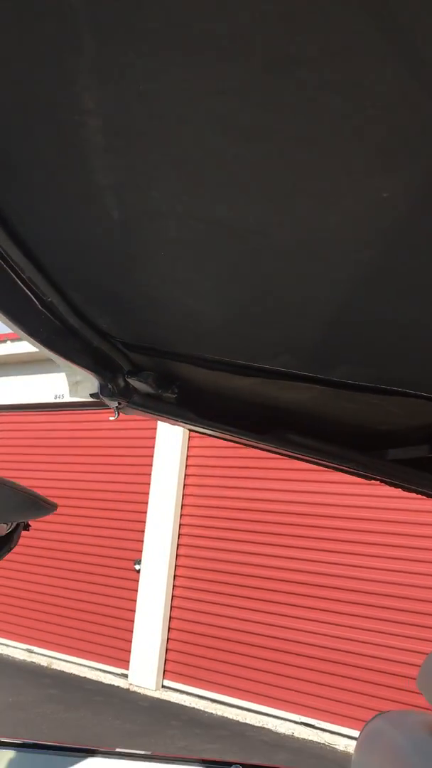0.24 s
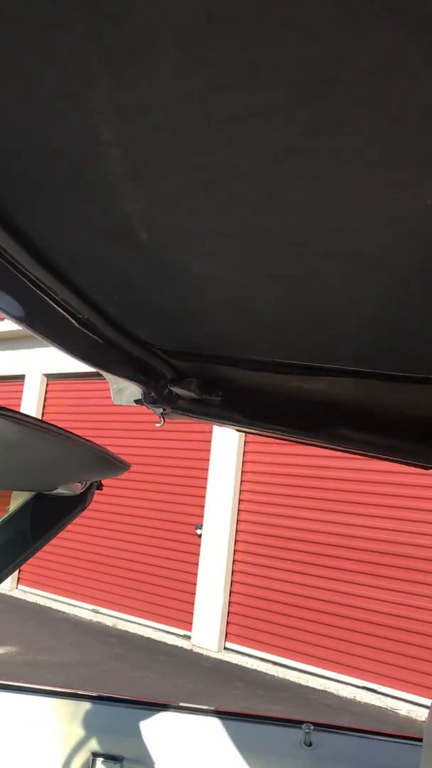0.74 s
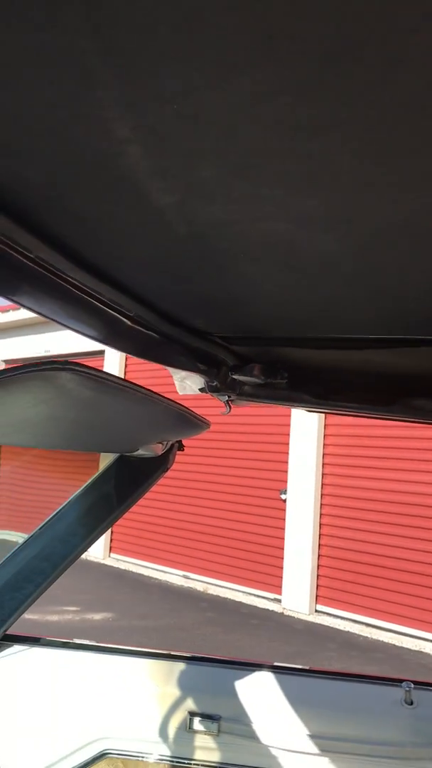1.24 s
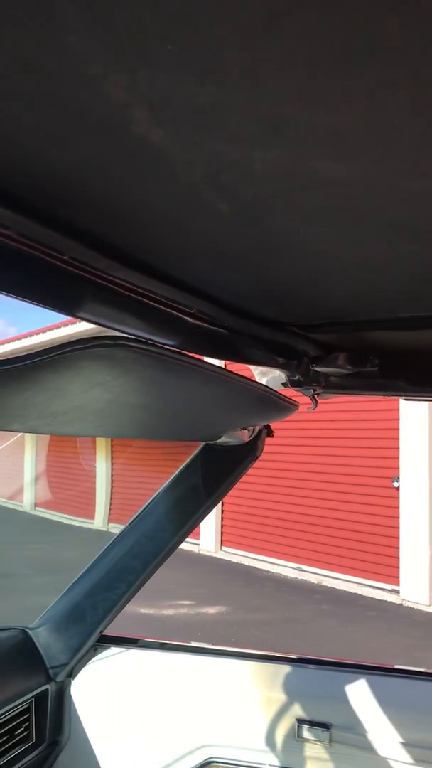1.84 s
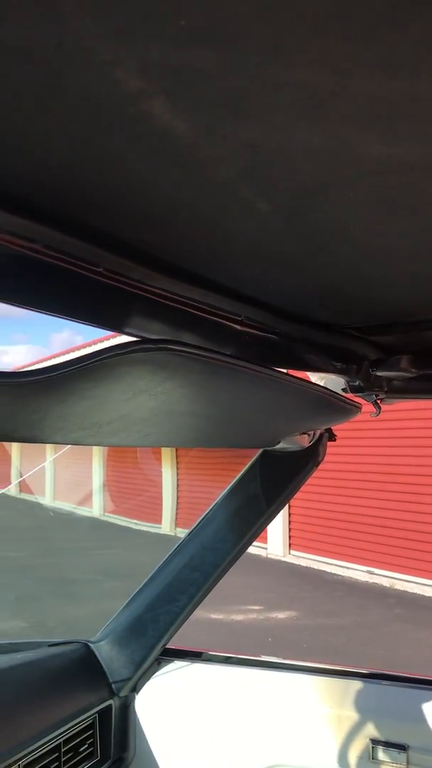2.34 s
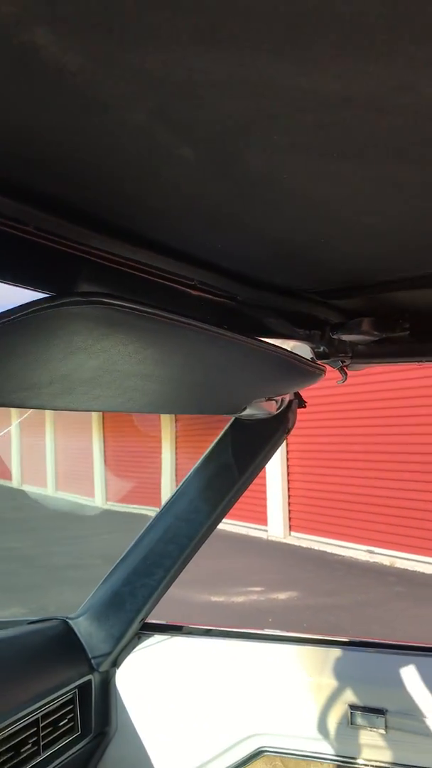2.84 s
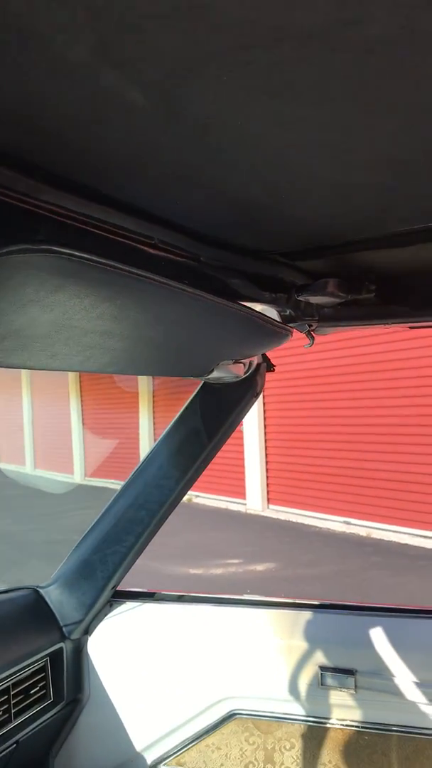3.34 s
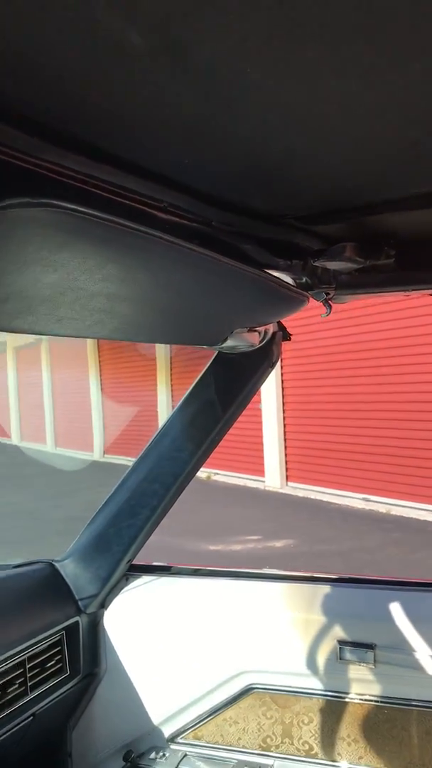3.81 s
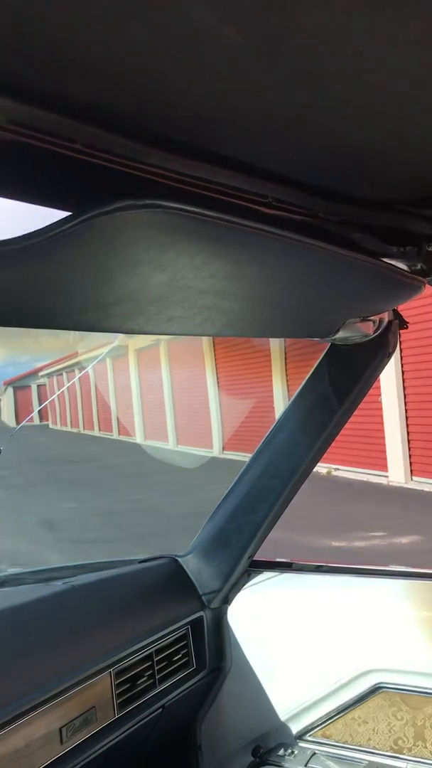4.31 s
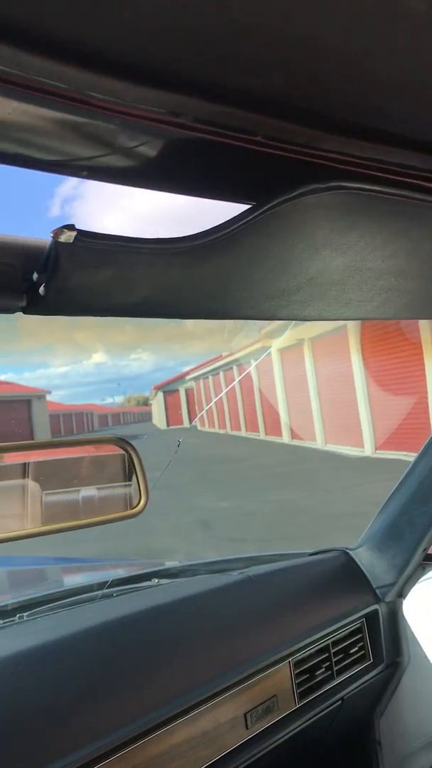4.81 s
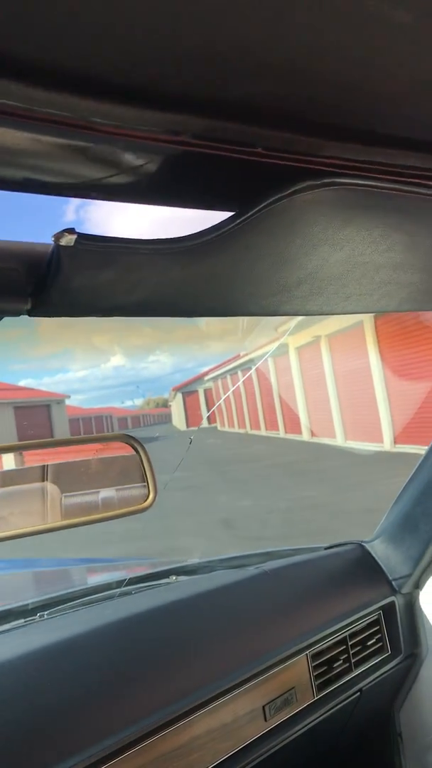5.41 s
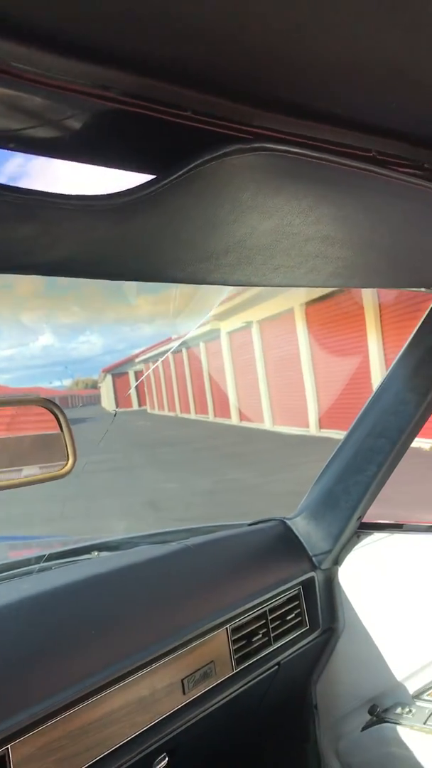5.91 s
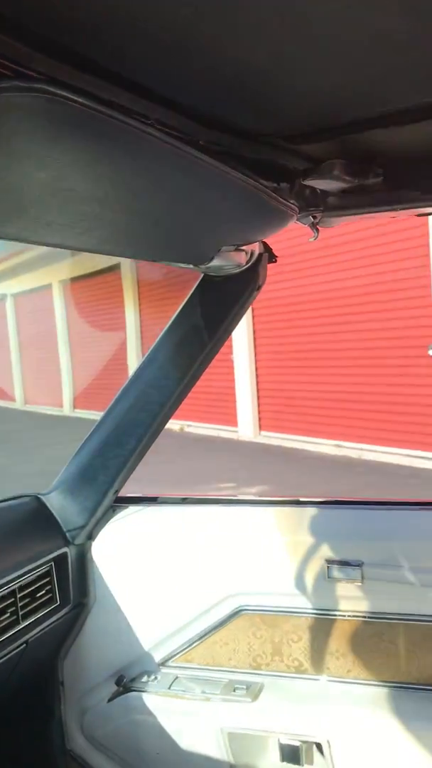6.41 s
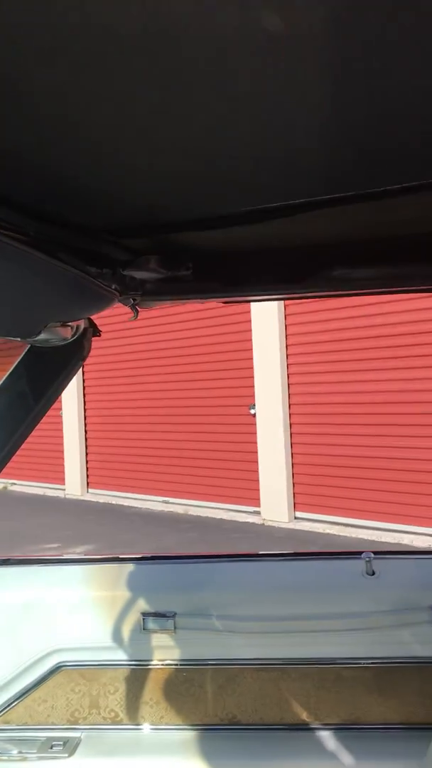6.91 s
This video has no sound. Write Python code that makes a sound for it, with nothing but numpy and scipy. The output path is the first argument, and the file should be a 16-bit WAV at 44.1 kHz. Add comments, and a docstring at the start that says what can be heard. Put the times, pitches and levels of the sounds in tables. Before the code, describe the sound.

From the front seat of an old convertible, a V8 engine idles with a low, throbbing burble and a body drone, its valves ticking rhythmically with small high squeaks. Over it, a hydraulic pump whirs and whines from the start as the soft top closes. At about 0.8 seconds the roof linkage gives a sharp, bright clack. Between 1.5 and 1.8 seconds the canvas pulls taut in a quick cluster of dull thuds, with another at 3.7. Frame joints tick singly from about 2.2 to 3.8 seconds, and two lighter knocks follow near 4.1, where the pump's whine drops back. The engine revs gently from about 4 seconds, peaks at 4.7 and eases off. A few quick ticks come around 5.5 seconds. A second, smaller rev peaks near 6.6, with a light knock, and the engine settles toward idle by 7 seconds.

```python
"""Closing the top of a convertible

Inside an old car a V8 idles and is revved gently twice. Its exhaust throbs in harmonics of the engine
cycle, the body drones, and the valve gear ticks, rings and squeaks as each cycle comes round.
A hydraulic pump whirs behind the seats and folds the frame forward: the linkage clacks,
the bows knock, the canvas flaps softly and the joints tick as they slip."""
import sys
import numpy as np
from scipy import signal
from scipy.fft import rfft, irfft
from scipy.io import wavfile
from scipy.ndimage import uniform_filter1d

SR = 44100
rng = np.random.default_rng(int(sys.argv[2]) if len(sys.argv) > 2 else 0)


def transcribe(signal):
    """Save signal, clipped to [-1, 1], as a 16-bit WAV file at the path in sys.argv[1]."""
    frames = np.atleast_2d(signal).T
    limited = np.clip(frames, -1, 1)
    pcm = np.round(limited * 32767).astype(np.int16)
    wavfile.write(sys.argv[1], SR, pcm)


N = 315315
TIME = np.arange(N) / SR
EVENT_TIME = TIME[:SR // 5]
BIN_HZ = np.fft.rfftfreq(N, 1 / SR)


def amp(db):
    """Amplitude ratio of a level in decibels."""
    return 10 ** (np.asarray(db) / 20)


def unit(x):
    """The signal scaled to an rms of one."""
    return x / np.sqrt(np.mean(x ** 2) + 1e-20)


def curve(rows, column=1):
    """One column of a time table, interpolated at every sample."""
    rows = np.array(rows)
    return np.interp(TIME, rows[:, 0], rows[:, column])


def response(spectrum, hz):
    """Gain of a spectrum, interpolated on a log-frequency axis."""
    points_hz, db = np.transpose(spectrum)
    return amp(np.interp(np.log(hz + 1), np.log(points_hz), db))


def filtered_noise(gain):
    """White noise weighted in frequency, at an rms of one."""
    return unit(irfft(rfft(rng.standard_normal(N)) * gain, N))


def noise(spectrum, tilt_db=0):
    """Noise of a given spectrum, tilted in dB per octave and rolled off past its ends."""
    hz = BIN_HZ + 1
    skirts = np.minimum(1, hz / spectrum[0][0]) ** 2 * np.minimum(1, spectrum[-1][0] / hz) ** 2
    return filtered_noise(response(spectrum, hz) * skirts * amp(tilt_db * np.log2(hz)))


def band(centre_hz, width_hz):
    """Noise in one resonance with steep skirts."""
    return filtered_noise(1 / (1 + ((BIN_HZ - centre_hz) / width_hz) ** 2) ** 2)


def drift(rate_hz):
    """Low-pass noise: a smooth random fluctuation."""
    return filtered_noise(np.exp(-(BIN_HZ / rate_hz) ** 2))


def stretch(source):
    """A random stretch of a signal, one event long."""
    start = rng.integers(N - len(EVENT_TIME))
    return source[start:start + len(EVENT_TIME)]


def envelope(decay_s, rise_s):
    """Quick build-up and exponential decay of a damped vibration."""
    return (1 - np.exp(-EVENT_TIME / rise_s)) * np.exp(-EVENT_TIME / decay_s)


def burst(source, decay_s, rise_s):
    """A damped transient cut from a noise."""
    return stretch(source) * envelope(decay_s, rise_s)


def add(mix, start_s, sound):
    """Superposes a sound on the mix."""
    part = mix[max(round(start_s * SR), 0):][:len(sound)]
    part += sound[:len(part)]


def reflections(x, wet_db, t60_s):
    """Reverberation: glass and trim add short, dense echoes."""
    t = EVENT_TIME
    taps = rng.standard_normal(len(t)) * (rng.random(len(t)) < 0.1)
    taps *= (t > 0.002) * amp(-60 * t / t60_s)
    return x + amp(wet_db) * signal.oaconvolve(x, taps / np.linalg.norm(taps))[:N]


def rustle(x, patchy_db, ripple_db):
    """Small resonances flare briefly; interfering reflections leave a steady spectral ripple."""
    spectra = signal.stft(x, nperseg=512, noverlap=384)[2]
    patches = uniform_filter1d(rng.standard_normal(spectra.shape), size=4, axis=0)
    patches = unit(uniform_filter1d(patches, size=7, axis=1))
    ripple = unit(uniform_filter1d(rng.standard_normal(len(spectra)), size=2))[:, None]
    spectra *= amp(patchy_db * patches + ripple_db * ripple)
    return np.std(x) * unit(signal.istft(spectra, nperseg=512, noverlap=384)[1][:N])


def pull(rpm, lead_s=0.036, ease_s=0.33):
    """Smoothed acceleration in rpm per second, advanced because the throttle leads the speed."""
    eased = uniform_filter1d(np.gradient(rpm) * SR, size=round(ease_s * SR))
    return np.interp(TIME + lead_s, TIME, eased)


def each_cycle(cycles, phase):
    """The times at which the engine passes one phase (0-1) of its cycle."""
    return np.interp(np.arange(phase, cycles[-1], 1), cycles, TIME)


# Exhaust harmonics. Each row: multiple of the cycle rate, relative level in dB.
EXHAUST_ORDERS = [(5, -7.5), (7, -71), (8, 0), (9, -11), (10, -11.5), (11, -4.5), (12, -9), (13, -3),
                  (14, -14), (15, -8), (16, -1.5), (17, -5), (19, -7.5), (21, -13), (24, -5), (29, -13),
                  (32, -20)]
# Transmission into the cabin. Each row: frequency in Hz, gain in dB.
CABIN_RESPONSE = [(30, -26), (46, 1), (62, 0.5), (76, 0.5), (100, 2), (112, -8.5), (126, -21), (143, -4.5),
                  (185, -20.5), (230, -15)]
# Cabin resonance: centre in Hz, half width in Hz, peak gain in dB.
CABIN_BOOM = (57.7, 2.9, 4.3)

def exhaust(rpm, cycle_hz, cycles):
    """Periodic pulses form a harmonic series: order 8 is the firing tone, all others make the burble."""
    firing, burble = np.zeros(N), np.zeros(N)
    boom_hz, boom_width_hz, boom_db = CABIN_BOOM
    for order, db in EXHAUST_ORDERS:
        hz = order * cycle_hz
        tone = amp(db) * response(CABIN_RESPONSE, hz) * np.cos(2 * np.pi * (order * cycles + rng.random()))
        if order == 8:
            boom = amp(boom_db / (1 + ((hz - boom_hz) / boom_width_hz) ** 2))
            firing += boom * tone * (1 + 0.06 * drift(4))
        else:
            burble += tone * (1 + 0.21 * drift(8.6))
    idle_rpm, knee_rpm = 715, 104
    above_idle = np.maximum(rpm - idle_rpm, 0)
    firing_db = -28.5 + 0.0169 * above_idle + 0.0096 * np.maximum(pull(rpm), 0)
    burble_db = -36 + 7 * np.tanh(above_idle / knee_rpm)
    return amp(firing_db) * firing + amp(burble_db) * burble


# Drone of the body. Each row: time in seconds, level in dB.
BODY_LEVEL = [(0, -44.5), (1.6, -42.5), (3, -45), (6.1, -45), (6.27, -55), (7.15, -44.5)]
# Its spectrum. Each row: frequency in Hz, relative level in dB.
BODY_SPECTRUM = [(30, -13), (48, -8.5), (90, -4.5), (125, -1.5), (170, 2), (230, -6), (262, -7), (285, -3),
                 (315, -10), (390, -10.5), (480, -18), (650, -30.5)]

def body_rumble():
    """Forced vibration: the running engine makes the body drone."""
    return amp(curve(BODY_LEVEL) + 0.62 * drift(21)) * noise(BODY_SPECTRUM)


# Spectrum of the valve gear. Each row: frequency in Hz, relative level in dB.
VALVE_SPECTRUM = [(1200, -20), (2200, -14), (3100, -9), (3900, -2.5), (4400, -6), (4900, -4.5), (5800, 3),
                  (6500, 3.5), (7200, -1.5), (8200, 0), (9600, -6), (10400, -11), (11300, -13),
                  (15700, -22)]
# Loose tappets. Each row: cycle phase from 0 to 1, relative level in dB, tilt in dB per octave.
TAPPET_IMPACTS = [(.14, -1, -8), (.365, -0.5, 4.5), (.6, -2, 2), (.742, 3, 1)]
# Resonance of the valve cover: centre in Hz, width in Hz.
COVER_MODE = (4397, 92)
# Blows that excite it. Each row: cycle phase from 0 to 1, relative level in dB.
COVER_IMPACTS = [(.2, -6), (.63, -2), (.77, -5.5)]

def valve_gear(cycles, level_db):
    """Impact excitation: in every cycle the tappets rattle and the cover rings, over a mechanical hiss."""
    rattle, rings, cover = np.zeros(N), np.zeros(N), band(*COVER_MODE)
    for phase, db, tilt_db in TAPPET_IMPACTS:
        tappet = noise(VALVE_SPECTRUM, tilt_db)
        for start in each_cycle(cycles, phase):
            strength = amp(db + 2 * rng.standard_normal())
            add(rattle, start, strength * burst(tappet, decay_s=0.016, rise_s=0.0027))
    for phase, db in COVER_IMPACTS:
        for start in each_cycle(cycles, phase):
            strength = amp(db + 1.5 * rng.standard_normal())
            add(rings, start, strength * burst(cover, decay_s=0.025, rise_s=0.003))
    hiss = amp(-3 + 1.47 * drift(47)) * noise(VALVE_SPECTRUM)
    gear = rustle(hiss + amp(4.5) * rattle, patchy_db=2.6, ripple_db=0.7)
    return amp(level_db) * (gear + amp(-1.5) * rings)


# Pump motor. Each row: time in seconds, shaft rate in Hz, whine level in dB.
PUMP_MOTOR = [(0, 90.6, -50.5), (.5, 87.4, -51), (1.1, 86.6, -54), (1.6, 89.8, -52), (2.35, 89.3, -51),
              (3.0, 88.6, -52.5), (3.9, 88.6, -53.5), (4.2, 85.1, -62), (7.15, 86.25, -57)]
# Its harmonics. Each row: multiple of the shaft rate, relative level in dB.
PUMP_HARMONICS = [(2, -7), (4, -8.5), (5, -3.5), (6, -5), (12, -16)]
# Broad whir, loudest as the pump takes up the load. Each row: time in seconds, level in dB.
WHIR_LEVEL = [(0, -48), (.67, -48), (1.1, -54.5), (5, -53), (5.6, -51.5), (7.15, -52)]
# Its spectrum. Each row: frequency in Hz, relative level in dB.
WHIR_SPECTRUM = [(200, 14.5), (420, 10), (600, 9), (750, 7), (950, -0.5), (1400, 4.5), (1900, 1.5),
                 (2600, -2), (3700, -4), (5000, -6.5), (9000, -20)]
# Oil in the valve and hoses, quieter as the top comes down. Each row: time in seconds, level in dB.
OIL_LEVEL = [(0, -51), (2.3, -50), (3.6, -53), (4.7, -52.7), (4.87, -60), (7.15, -61)]
# Its spectrum. Each row: frequency in Hz, relative level in dB.
OIL_SPECTRUM = [(420, -8), (650, 1.5), (850, 2), (1060, 2.5), (1200, -0.5), (1400, -3.5), (1750, -10.5),
                (2400, -14.5)]

def hydraulic_pump():
    """Rotation gives harmonics of the shaft rate, heard with a broadband whir and the oil's flow noise."""
    turns = np.cumsum(curve(PUMP_MOTOR) * (1 + 0.00912 * drift(12.6))) / SR
    whine = sum(amp(db) * (1 + 0.26 * drift(40)) * np.sin(2 * np.pi * order * turns)
                for order, db in PUMP_HARMONICS)
    whir_db = curve(WHIR_LEVEL) + 0.39 * drift(11)
    whir = amp(whir_db) * rustle(noise(WHIR_SPECTRUM), patchy_db=2.5, ripple_db=0.74)
    oil = amp(curve(OIL_LEVEL) + 0.83 * drift(11.6)) * noise(OIL_SPECTRUM)
    return amp(curve(PUMP_MOTOR, column=2)) * whine + whir + oil


# The loudest valve-gear squeaks. Each row: start in seconds, level in dB, pitch in Hz.
LOUD_SQUEAKS = [(.125, -40, 4460), (.289, -37, 5750), (.455, -39, 4410), (.897, -38.5, 5980),
                (1.306, -39.5, 4410), (1.811, -42, 5720), (2.482, -36, 4460), (2.654, -41, 5510),
                (2.821, -39.5, 4420), (2.98, -44, 4370), (4.431, -39, 4550), (5.519, -43, 4400)]

def valve_squeaks(cycles, valve_db, faint_hz=4400):
    """Dry friction: a fluttering tone sounds faintly once a cycle, with louder squeaks now and then."""
    out, flutter = np.zeros(N), drift(310)
    faint = [(start, np.interp(start, TIME, valve_db) - 2 - rng.standard_normal(), faint_hz)
             for start in each_cycle(cycles, phase=0.86)]
    swell = envelope(decay_s=0.015, rise_s=0.005)
    for start, db, hz in LOUD_SQUEAKS + faint:
        turns = np.cumsum(hz * (1 + 0.02 * stretch(flutter))) / SR
        add(out, start, amp(db) * np.sin(2 * np.pi * turns) * swell)
    return reflections(out, wet_db=-6, t60_s=0.08)


# Clacks of the linkage. Each row: start in seconds, level in dB, decay time in seconds.
LINKAGE_CLACKS = [(0.772, -28, 0.0051), (.777, -29.5, 0.018), (4.142, -38, 0.012), (5.567, -41, 0.016)]
# Their spectrum. Each row: frequency in Hz, relative level in dB.
LINKAGE_SPECTRUM = [(150, 13.5), (600, -10), (1500, -8), (2800, -9), (4250, 4), (5000, -1), (6200, 2.5),
                    (7600, 7), (9200, -1), (10500, -19), (15500, -24)]
# Knocks of the roof bows. Each row: start in seconds, level in dB, centre in Hz, decay time in seconds.
BOW_KNOCKS = [(.778, -37, 850, 0.018), (4.071, -42, 1760, 0.014), (6.487, -38.5, 744, 0.0035)]

def frame_impacts():
    """Brief impacts excite a wide band: the linkage clacks brightly and the bows knock dully."""
    out, metal = np.zeros(N), noise(LINKAGE_SPECTRUM)
    for start, db, decay_s in LINKAGE_CLACKS:
        add(out, start, amp(db) * burst(metal, decay_s, rise_s=0.00058))
    for start, db, hz, decay_s in BOW_KNOCKS:
        add(out, start, amp(db) * burst(band(hz, 1.3 * hz), decay_s, rise_s=0.00047))
    return out


# Flaps of the canvas. Each row: start in seconds, level in dB, decay time in seconds.
CANVAS_FLAPS = [(1.47, -23, 0.018), (1.526, -20, 0.014), (1.635, -27, 0.014), (1.721, -28.5, 0.035),
                (1.776, -29, 0.01), (3.708, -24.5, 0.032)]
# Their spectrum. Each row: frequency in Hz, relative level in dB.
CANVAS_SPECTRUM = [(40, 13), (70, 12.5), (110, 19.5), (170, 11), (280, -16), (420, -42.5), (900, -28)]

def canvas():
    """A damped membrane: the cloth pulls taut with dull thuds that shake the car's body."""
    out, cloth, body = np.zeros(N), noise(CANVAS_SPECTRUM), noise(BODY_SPECTRUM)
    for start, db, decay_s in CANVAS_FLAPS:
        shake = amp(-5.5) * burst(body, decay_s=0.023, rise_s=0.011)
        thud = burst(cloth, decay_s, rise_s=0.0045)
        add(out, start, amp(db) * (thud + shake))
    return out


# Slips of a frame joint. Each row: start in seconds, level in dB.
JOINT_SLIPS = [(2.163, -31.5), (2.509, -30.5), (3.118, -30), (3.763, -28.5), (5.501, -31.3), (5.562, -34.5),
               (5.645, -30)]
# Its hollow note: first and last pitch in Hz, then glide time and decay time in seconds.
JOINT_NOTE = (1680, 1120, 0.0015, 0.00071)

def joint_ticks():
    """Dispersion: bending waves bring their high frequencies first, so each tick sweeps downward."""
    out, t, snap_noise = np.zeros(N), EVENT_TIME, band(3100, 6600)
    first_hz, last_hz, glide_s, decay_s = JOINT_NOTE
    turns = np.cumsum(last_hz + (first_hz - last_hz) * np.exp(-t / glide_s)) / SR
    tick = np.sin(2 * np.pi * turns) * (t / decay_s) * np.exp(1 - t / decay_s)
    for start, db in JOINT_SLIPS:
        snap = amp(-15.5) * burst(snap_noise, decay_s=0.01, rise_s=0.00025)
        add(out, start, amp(db) * (tick + snap))
    return reflections(out, wet_db=-4.5, t60_s=0.093)


# Engine speed. Each row: time in seconds, revolutions per minute.
ENGINE_RPM = [(0.0, 731.9), (1.03, 702.5), (2.84, 715.8), (2.96, 733.6), (3.87, 711.4), (4.7, 981.7),
              (5.32, 783.7), (6.6, 849.1), (7.15, 732.4)]
# Valve gear at a steady speed. Each row: time in seconds, level in dB.
VALVE_STEADY_LEVEL = [(0, -50.5), (2.5, -52), (4.1, -53), (5.1, -56), (6.2, -53.5), (7.15, -52)]

def scene():
    """Superposition of engine and roof at the front seat."""
    rpm = curve(ENGINE_RPM)
    cycle_hz = rpm / 120  # one cycle takes two revolutions
    cycles = np.cumsum(cycle_hz) / SR
    valve_db = curve(VALVE_STEADY_LEVEL) + 0.0132 * pull(rpm)  # louder pulling, softer coasting
    engine = exhaust(rpm, cycle_hz, cycles) + body_rumble()
    valves = valve_gear(cycles, valve_db) + valve_squeaks(cycles, valve_db)
    roof = hydraulic_pump() + frame_impacts() + canvas() + joint_ticks()
    return (engine + valves + roof)[None]


def record(dry, cutoff_hz=15750):
    """Band limiting: a steep low-pass filter removes the highest treble."""
    low_pass = signal.firwin(1023, cutoff_hz, window=("kaiser", 9), fs=SR)
    return signal.oaconvolve(dry, low_pass[None], "same")


dry = scene()
out = record(dry)
transcribe(out)
```